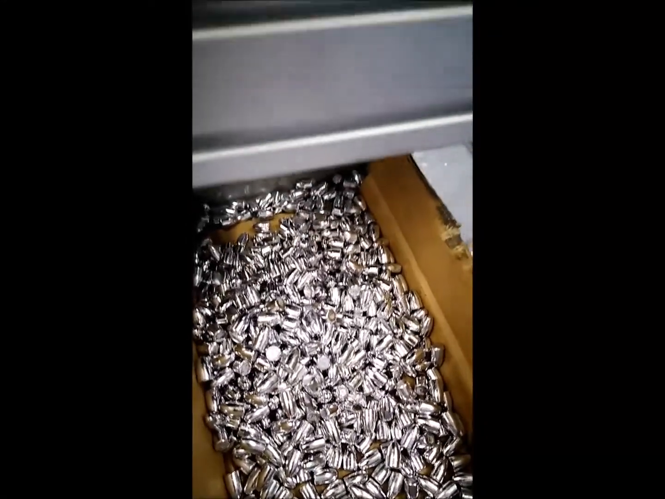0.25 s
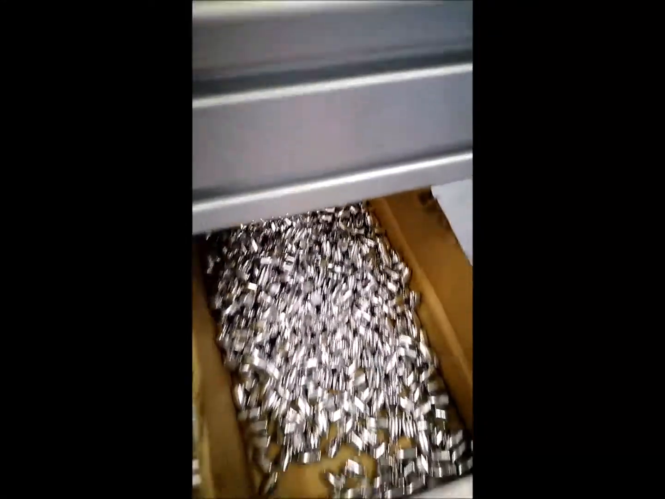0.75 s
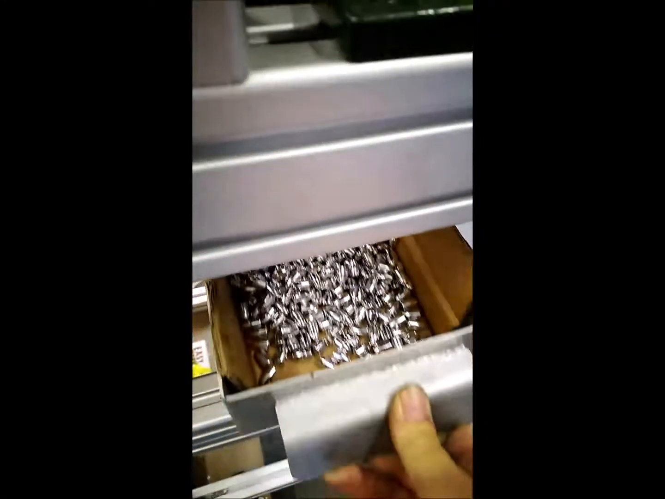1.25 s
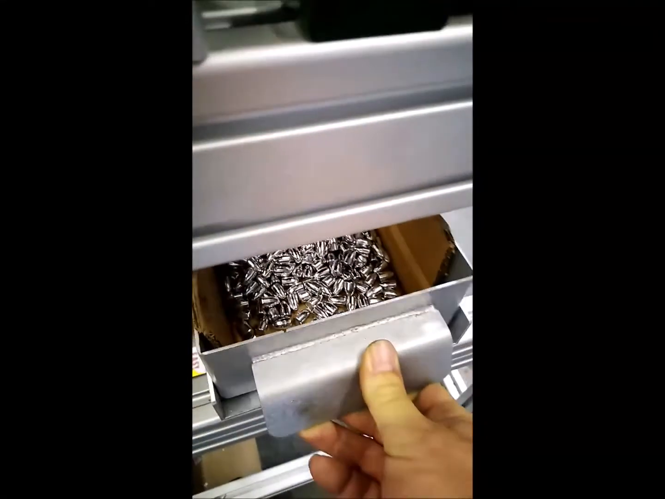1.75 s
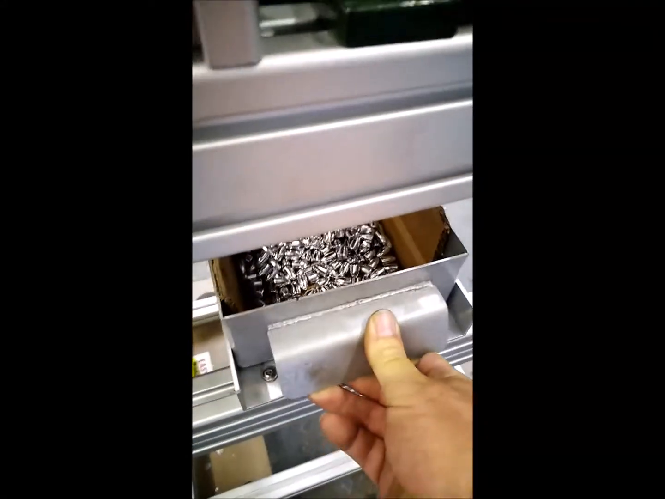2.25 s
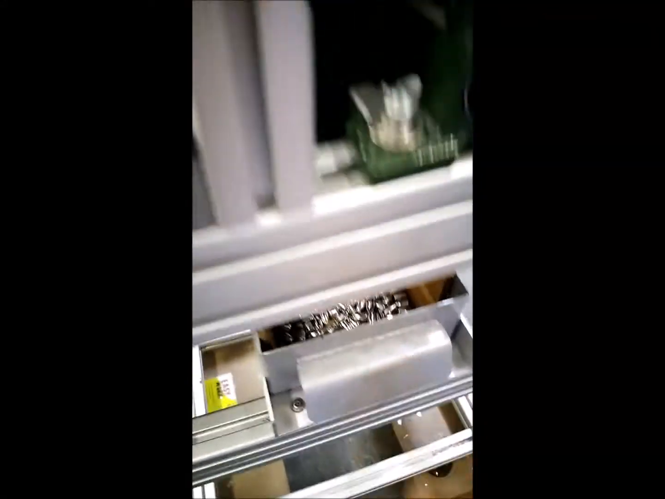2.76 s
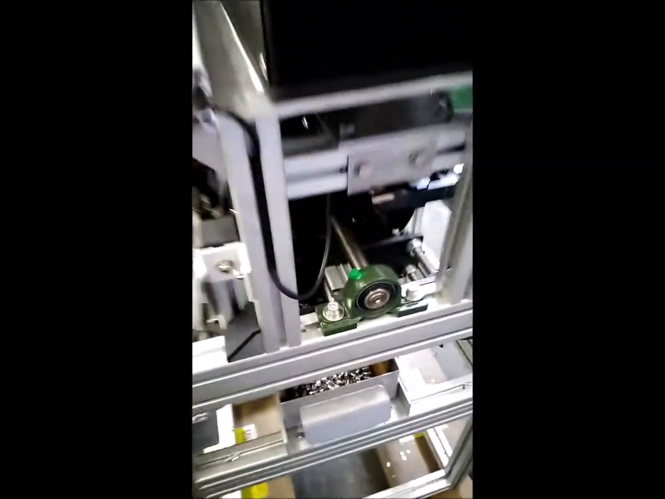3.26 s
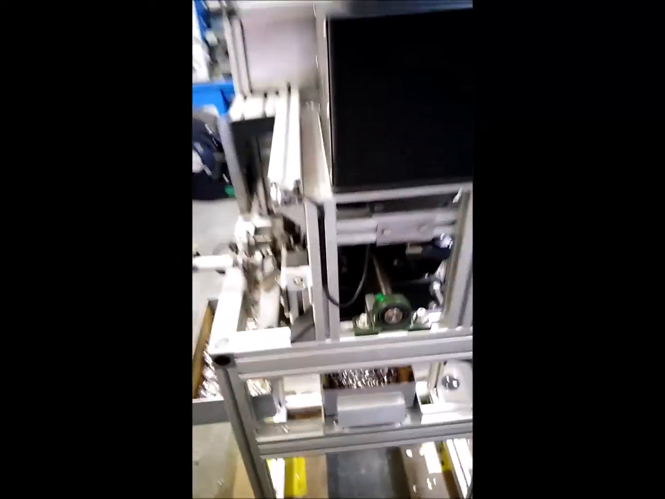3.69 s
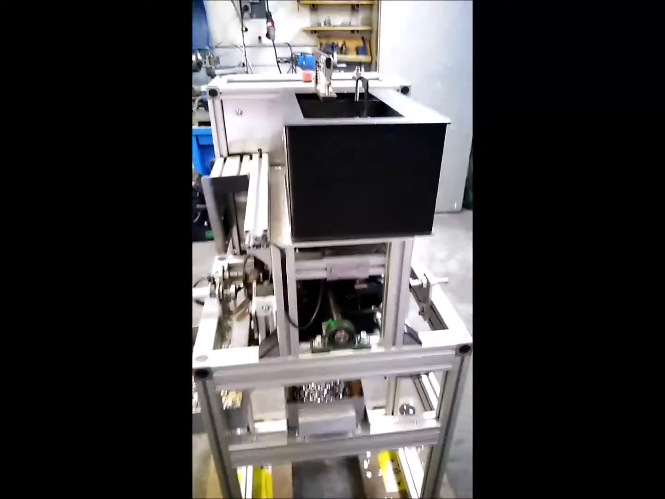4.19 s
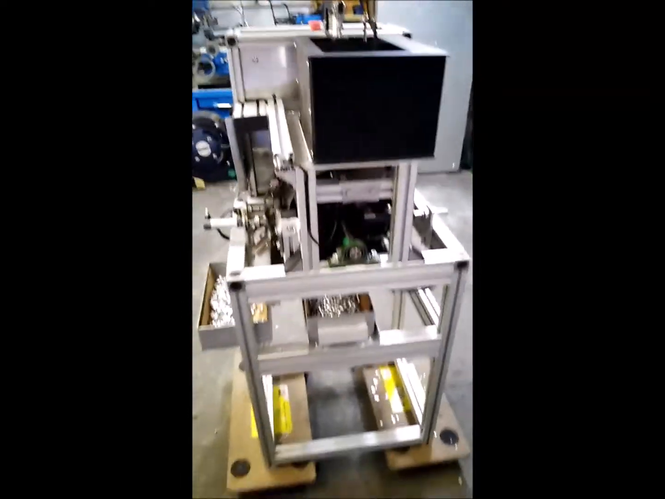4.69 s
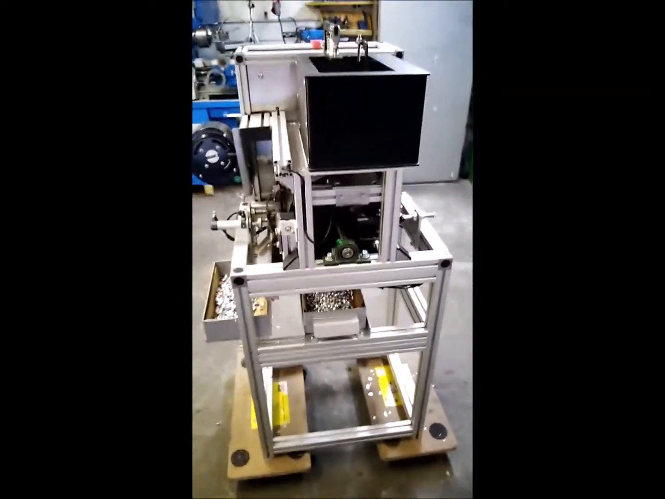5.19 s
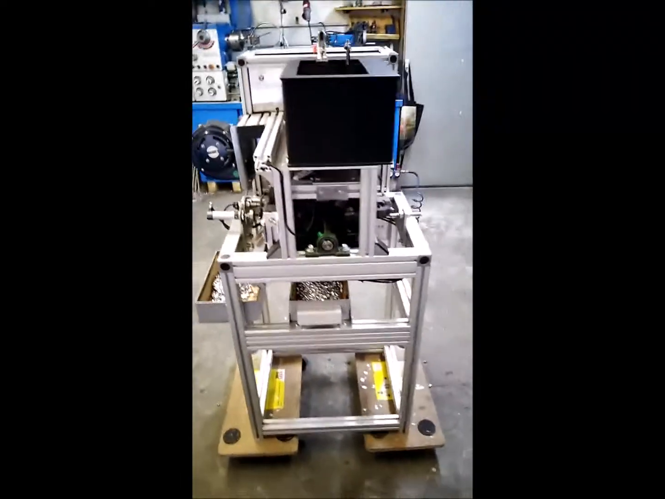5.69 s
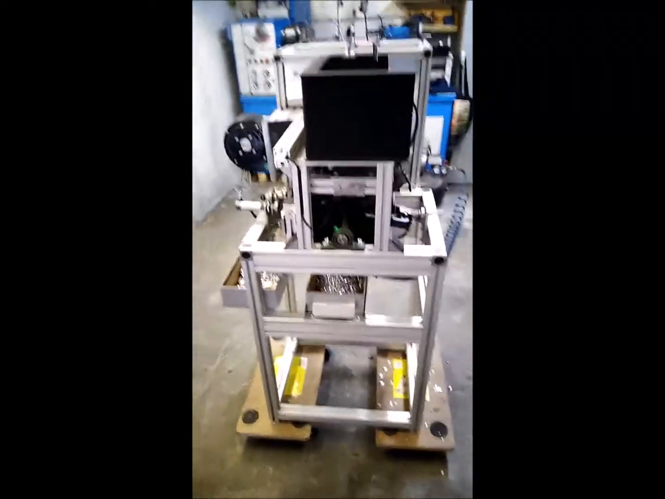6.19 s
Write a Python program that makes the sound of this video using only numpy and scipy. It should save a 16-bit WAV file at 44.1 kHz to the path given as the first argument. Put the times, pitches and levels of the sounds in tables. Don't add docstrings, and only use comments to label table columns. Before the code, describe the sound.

A stereo phone microphone in a hard-walled workshop. Over a thin, flickering mid-pitched motor whine, a drawer jolts at 0.13 s and its small metal parts tick. From 0.5 s it slides, droning and scraping with shaking parts, knocks at 0.75, slows and snags near 1.26. From 1.35 to 2.0 s a pneumatic machine erupts: sharp air jets, rattling cylinder clanks and parts tinkling on a steel chute, loudest and clipping around 1.85. More blasts come at 2.6 and 2.84, then hollow metal knocks and a heavy thud at 3.08, and a last hiss-clank at 3.23. Echoes and whine sink away by 4.0. In near-silence a faint latch clicks at 4.44 with a sagging spring creak; watery hum scraps flicker, and low air thumps hit the right side at 5.2-5.5. From 5.7 to the end, the machine cycles again, more distant and echoing, tails cut short.

```python
import sys
import numpy as np
from scipy import signal
from scipy.fft import rfft, irfft, next_fast_len
from scipy.io import wavfile
from scipy.ndimage import uniform_filter1d, map_coordinates

SR = 44100
rng = np.random.default_rng(int(sys.argv[2]) if len(sys.argv) > 2 else 0)


def to_wav(sig):
    pcm = np.clip(np.atleast_2d(sig), -1, 1) * 32767
    pcm = np.round(pcm).astype(np.int16)
    wavfile.write(sys.argv[1], SR, pcm.T)


def invert_db(level):
    return 10 ** (np.asarray(level, dtype=float) / 20)


N = 284004


def unit(x):
    return x / np.sqrt(np.mean(x ** 2) + 1e-20)


def along(points, hz):
    f, v = np.transpose(points)
    return np.interp(np.log(hz + 1), np.log(f + 1), v)


def curves(rows, outside=None):
    s, *columns = np.transpose(rows)
    t = np.arange(N) / SR
    return [np.interp(t, s, column, outside, outside) for column in columns]


def wobble(rate):
    knots = rng.standard_normal(int(N * rate / SR) + 4)
    return map_coordinates(knots, [np.arange(N) * rate / SR])


def filtered(x, response):
    n = x.shape[-1]
    m = next_fast_len(n + 8192)
    return irfft(rfft(x, m) * response(np.fft.rfftfreq(m, 1 / SR)), m)[..., :n]


def peak(f, hz, width_hz):
    return np.abs(f * width_hz / (hz * hz - f * f + 1j * f * width_hz))


def resonances(f, rows, extra_db=0):
    return sum(invert_db(db + extra_db) * peak(f, hz, width_hz) for hz, width_hz, db in rows)


def dying(t60, rise):
    t = np.arange(SR // 2) / SR
    return invert_db(-60 * t / max(t60, .01)) * (1 - np.exp(-t / max(rise, .0003)))


def held(s, length, rise, fall):
    shape, i = np.zeros(N), max(round(s * SR), 0)
    t = np.arange(min(N - i, SR // 2)) / SR
    shape[i:][:len(t)] = np.clip(t / rise, 0, 1) * invert_db(-60 * np.clip(t - length, 0, 1) / fall)
    return shape


# frequency in Hz, likeness from 0 to 1.
PORT_LIKENESS = [(100, 0.96), (250, 0.94), (600, 0.56), (1200, 0.021)]


def pair(n):
    turn = lambda hz: np.arccos(np.clip(along(PORT_LIKENESS, hz), 0, 1)) / 2
    split = lambda hz: np.array([np.cos(turn(hz)), np.sin(turn(hz))])
    mid, side = filtered(rng.standard_normal((2, n)), split)
    return np.array([mid + side, mid - side])


def rush(spectrum, lumpy_db):
    z = signal.stft(pair(N), nperseg=512)[2]
    field = uniform_filter1d(rng.standard_normal(z.shape), size=5, axis=1)
    field = uniform_filter1d(field, size=5, axis=2)
    patchy = signal.istft(z * invert_db(lumpy_db * unit(field)), nperseg=512)[1][:, :N]
    return unit(filtered(patchy, lambda hz: invert_db(along(spectrum, hz))))


def new_bus():
    return np.zeros((3, N + SR))


LEFT_LAG = 20


def add(bus, s, burst, db, pan_db, echo_db):
    i = round(s * SR)
    bus[0, i + LEFT_LAG:][:len(burst)] += invert_db(db + pan_db / 2) * burst
    bus[1, i:][:len(burst)] += invert_db(db - pan_db / 2) * burst
    bus[2, i:][:len(burst)] += invert_db(db + echo_db) * burst


# frequency in Hz, level in dB per Hz.
AIR_SPECTRUM = [(880, -39), (1500, -24.5), (2630, -12.5), (2940, -16), (3450, -11), (3860, -14.5),
                (5500, -9.5), (7350, -4), (9110, -5.5), (11800, -16.5), (14000, -25.5)]
# frequency in Hz, width in Hz, level in dB.
VALVE_BLOCK_MODES = [(4940, 16, -8), (6120, 7.7, -11), (6650, 4.6, -7.5), (7140, 4.5, -4), (7460, 32, 6),
                     (7845, 110, 7), (8400, 3.5, -3.5), (9350, 2.3, -0.5)]
JET_GRAIN_DB = 2


def air_jet():
    colour = lambda hz: invert_db(along(AIR_SPECTRUM, hz)) * (1 + resonances(hz, VALVE_BLOCK_MODES))
    jet = unit(filtered(rng.standard_normal(N + SR), colour))
    grain = np.tile(invert_db(JET_GRAIN_DB * wobble(220)), 2)[:N + SR]
    return unit(jet * grain)


VENT_T60_S, VENT_RISE_S = 0.11, 0.00072
VENT_HALVES_DB = 30.5
VENT_FAR_DOUBLES_DB = 30.5


def bursts(jet, rows, shorter):
    bus = new_bus()
    for s, db, pan_db, echo_db in rows:
        t60 = shorter * VENT_T60_S * .5 ** (db / VENT_HALVES_DB - echo_db / VENT_FAR_DOUBLES_DB)
        burst = jet[round(s * SR):][:SR // 2] * dying(t60, VENT_RISE_S)
        add(bus, s, burst, db - 10, pan_db, echo_db)
    return bus


# start in seconds, peak level in dB, left-right difference in dB, echo in dB.
EXHAUSTS = [(1.2631, -33, -11, -11), (1.342, -13.5, 1, -2), (1.3774, -20, -12, -1), (1.3966, -3.5, 8, -26),
            (1.4515, -6.5, 9, -30), (1.47, -6.5, -9, -15), (1.5219, -11, -5, 0), (1.5327, 9.5, 10.5, -2),
            (1.5868, 7.5, -1, -4.5), (1.605, -0.5, 3, -19), (1.8437, 20, 3, -5), (1.866, 10, 16.5, -14),
            (1.93, 12, -5, -7), (1.953, -0.5, 0, -9.5), (2.5614, -3.5, 10.5, -4), (2.5817, 1, -9, 4),
            (2.6092, 13.5, 1, -9.5), (2.8354, 14, 6.5, -3.5), (3.0771, 3, -3, -3),
            (3.1776, -6.5, -0.5, 10.5), (3.226, -6, -2, -9), (3.2328, 0.5, 15, -9.5),
            (4.429, -36.5, -11, 3.5), (4.438, -32, -9, 0.5), (4.4526, -31.5, -18.5, -19.5),
            (5.6626, -35.5, 2, -12), (5.668, -19.5, 1, 6.5), (5.7171, -21, -11.5, -5),
            (5.778, -9, -2, -0.5), (5.846, 1.5, -10.5, 2.5), (5.918, -1, -12, 3.5), (6.163, 2, -6, 8.5),
            (6.1944, -8, 10, 7), (6.289, -1, 7, 3.5)]


def valves(jet):
    return bursts(jet, EXHAUSTS, shorter=0.96)


# start in seconds, peak level in dB, ringing in Hz, echo in dB.
CYLINDER_STOPS = [(0.142, -30.5, 430, -0.5), (0.75, -11.5, 498, -4), (1.347, -21, 809, 8),
                  (1.376, -19, 809, 9), (1.396, -10.5, 591, -11), (1.399, -9.5, 2200, -8.5),
                  (1.45, 2, 540, -9), (1.461, -5.5, 2180, -11), (1.471, -7.5, 2150, -4.5),
                  (1.524, 2, 1730, 2), (1.585, -3.5, 1416, -2.5), (1.604, 7.5, 1793, -4),
                  (1.865, 5, 2435, -1), (1.961, -9.5, 630, 7), (1.979, -13, 2090, 0.5),
                  (2.572, -5.5, 630, -2.5), (2.586, -5.5, 1879, -17), (2.608, -1, 2700, -1.5),
                  (2.844, -19, 2270, 2.5), (2.974, -15.5, 777, 4), (3.027, -18, 730, 9.5),
                  (3.045, -22.5, 740, 13.5), (3.176, -20.5, 666, 5), (3.23, -3, 2403, -7.5),
                  (3.228, -11, 1248, 0), (5.671, -29, 2358, 2), (5.7, -18.5, 687, 7.5),
                  (5.779, -3.5, 2250, 0), (5.845, -4, 2442, 1), (5.85, -4, 600, 0.5), (5.866, -11, 1450, 2),
                  (5.94, -5, 1500, 0), (5.913, -2, 2120, 4), (5.989, -24, 2366, 1), (6.193, -5, 1940, 2),
                  (6.205, -4.5, 2500, 0.5), (6.235, -12, 887, 4), (6.31, -10, 2640, 5.5)]
# start in seconds, peak level in dB, ringing in Hz, echo in dB.
LATCHES = [
    (0.176, -32.5, 3514, -2.5),
    (4.44, -28.5, 1010, 0.5),
]
# frequency in Hz, width in Hz, level in dB.
FRAME_MODES = [(792.4, 200, -20.5), (1260, 190, 12), (1640, 16, -12.5), (2200, 30, 11.5), (3262, 48, -22.5)]
# frequency in Hz, level in dB per Hz.
CLANK_SPECTRUM = [(88, -30.5), (150, -1.5), (238, -1), (516, -6), (700, -1.5), (1020, -6.5), (1400, -6),
                  (2170, -6), (3090, -8), (6000, -11), (7800, -57.5), (13200, -120)]
STOP_T60_S, STOP_HALVES_DB = 0.074, 27.5
TILT_DB, TILT_BY_PITCH_DB = -0.5, -0.53
FRAME_SHIFT, FRAME_SCATTER_DB = .08, 4
SMALL_SHARE = 0.13
CHATTER_DB = 3


def stops():
    bus = new_bus()
    chatter = np.tile(invert_db(CHATTER_DB * wobble(250)), 2)
    for rows, on_frame in (CYLINDER_STOPS, True), (LATCHES, False):
        for s, db, ring_hz, echo_db in rows:
            t60 = STOP_T60_S * .5 ** (db / STOP_HALVES_DB)
            tilt_db = TILT_DB + TILT_BY_PITCH_DB * np.log2(ring_hz / 1200)
            spot = rng.standard_normal((len(FRAME_MODES), 2)) * [FRAME_SHIFT, FRAME_SCATTER_DB]
            modes = [(hz * (1 + shift), width, level + more)
                     for (hz, width, level), (shift, more) in zip(FRAME_MODES, spot)]
            rings = lambda f: 2.0 + 2.8 * peak(f, ring_hz, 170) + on_frame * resonances(f, modes, -8)
            body = lambda f: f ** 2 / (f ** 2 + (SMALL_SHARE * ring_hz) ** 2)
            tilted = lambda f: invert_db(along(CLANK_SPECTRUM, f) + tilt_db * np.log2((f + 50) / 1200))
            noise = chatter[round(s * SR) % N:][:SR // 5] * rng.standard_normal(SR // 5)
            rattle = unit(filtered(noise, lambda f: tilted(f) * rings(f) * body(f)))
            blow = rattle * dying(t60, .003)[:SR // 5]
            add(bus, s, blow, db - 3.5, 1.5, echo_db)
    return bus


# start in seconds, peak level in dB, ringing in Hz,
# decay time t60 in seconds, echo in dB.
DULL_KNOCKS = [(0.132, -27, 169.5, 0.18, -3.5), (0.746, -23, 419, 0.21, 3.5), (1.393, -24, 282, 0.14, 7),
               (1.445, -23, 360.3, 0.22, -7), (1.53, -19, 301, 0.041, 1.5), (1.872, -20, 337.4, 0.27, -4.5),
               (2.049, -25.5, 450.5, 0.63, -3), (2.571, -31, 281, 0.11, -7), (2.641, -25, 286, 0.26, 12),
               (2.967, -25, 441, 0.15, -5), (3.08, 3, 188.2, 0.062, -7), (3.121, -5, 171, 0.14, -14),
               (3.18, -14, 153, 0.094, 14.5), (3.228, -16, 270.4, 0.075, 6), (5.714, -35, 326, 0.52, 10),
               (5.85, -24, 300, 0.04, -4), (6.201, -25, 260.4, 0.46, -6),
               (6.326, -34.5, 263.7, 0.96, -25.5)]
# frequency in Hz, level in dB per Hz.
THUD_SPECTRUM = [(18, -47.5), (30, -35), (149, -8), (199, -5.5), (301, -8.5), (422, -10), (600, -13.5),
                 (780, -28.5), (1320, -120)]


def knocks():
    bus = new_bus()
    for s, db, ring_hz, t60, echo_db in DULL_KNOCKS:
        colour = lambda hz: invert_db(along(THUD_SPECTRUM, hz)) * (0.86 + peak(hz, ring_hz, width_hz=21))
        thud = unit(filtered(rng.standard_normal(SR // 2), colour)) * dying(t60, 0.034)
        add(bus, s, thud, db, 0, echo_db)
    return bus


# start in seconds, peak level in dB, frequency in
# Hz, width in Hz, decay time t60 in seconds.
RINGING_PARTS = [(0.132, -25, 426, 16, 0.075), (0.639, -34, 1870, 34, 2.3), (1.959, -30, 152.1, 4.5, 0.98),
                 (2.597, -27, 152.8, 4.1, 0.92), (2.975, -3, 717, 43, 0.036), (3.025, -6.5, 760, 67, 0.075),
                 (3.03, -12.5, 1454, 54, 0.079), (3.045, -7, 758, 100, 0.093), (3.068, -14, 748, 85, 0.06),
                 (3.08, -11, 155.2, 4, 0.6), (3.081, -13, 178.1, 8, 0.25), (3.082, -7, 289.6, 35, 0.17),
                 (4.444, -25, 577, 66, 0.33), (4.44, -25, 972, 170, 0.18), (4.441, -28.5, 357, 53, 0.14),
                 (4.444, -31, 1338, 46, 0.41), (4.468, -29, 1590, 125, 0.11), (5.85, -7, 1320, 117, 0.5),
                 (6.198, -21, 258.2, 14, 1.17),
                 (0.478, -40, 420, 30, .3), (0.75, -31, 1900, 25, .4), (1.6, -12, 1748, 12, .2),
                 (1.846, -15, 8230, 40, .1), (1.535, -17, 7671, 12, .3), (1.535, -18, 8226, 15, .3),
                 (5.848, -20, 7564, 16, .4), (2.16, -30, 1942, 8, .6), (1.975, -15, 2094, 10, .25),
                 (1.98, -25, 1942, 10, .4), (4.5, -43, 520, 140, .5), (1.262, -30, 1680, 40, .1)]


def ringing():
    bus, t = new_bus(), np.arange(SR // 2) / SR
    for s, db, hz, width_hz, t60 in RINGING_PARTS:
        step = np.sqrt(2 * np.pi * abs(width_hz) / SR)
        wander = np.cumsum(rng.standard_normal(len(t))) * step
        tone = filtered(np.sin(2 * np.pi * hz * t + wander), lambda f: peak(f, hz, hz))
        add(bus, s, tone * dying(t60, 0.00027), db, 0, echo_db=-7)
    return bus


# frequency in Hz, level in dB.
CHUTE_MODES = [(4140, -9), (4860, -9), (5772, -9), (6212, -6), (6670, -9), (6885, -1), (7254, 0),
               (7550, -6), (7752, -3), (7827, -2), (8870, -8), (9180, -4), (9652, -11)]
# start in seconds, peak level in dB, decay time t60 in seconds.
CHUTE_STRIKES = [(1.4, -24, .2), (1.535, -24, .2), (1.846, -20, .25), (1.931, -15, .35), (1.953, -18, .35),
                 (2.61, -26, .2), (2.837, -24, .2), (3.232, -26, .25), (5.847, -27, .25), (5.918, -26, .25),
                 (6.166, -18, .35), (6.235, -19, .4), (6.29, -19, .4)]
STRIKE_SCATTER_DB, CHUTE_WIDTH_HZ, CHUTE_ECHO_DB = 2, 16, -5


def chute():
    bus, t = new_bus(), np.arange(SR // 2) / SR
    hz, level_db = np.transpose(CHUTE_MODES)[:, :, None]
    step = np.sqrt(100 * np.pi * CHUTE_WIDTH_HZ / SR)
    for s, db, t60 in CHUTE_STRIKES:
        wander = np.cumsum(rng.standard_normal((len(hz), len(t) // 50 + 1)), axis=1) * step
        phase = 2 * np.pi * hz * t + np.repeat(wander, 50, axis=1)[:, :len(t)]
        mix = invert_db(level_db + STRIKE_SCATTER_DB * rng.standard_normal(hz.shape))
        plate = (mix * np.sin(phase)).sum(axis=0)
        add(bus, s, plate * dying(t60, .002), db, 0, CHUTE_ECHO_DB)
    return bus


CLINKS, CLINK_LOW_HZ, CLINK_HIGH_HZ = 16, 1500, 7000
CLINK_SPREAD_S, CLINK_T60_S = .09, .025
CLINK_DB, CLINK_FADE_DB_PER_S, CLINK_SCATTER_DB = 4, 55, 4


def clinks():
    bus, t = new_bus(), np.arange(SR // 30) / SR
    for s, db, _ in CHUTE_STRIKES:
        for wait, pitch, size, side in rng.random((CLINKS, 4)):
            late = -CLINK_SPREAD_S * np.log(1 - wait)
            hz = CLINK_LOW_HZ * (CLINK_HIGH_HZ / CLINK_LOW_HZ) ** pitch
            tones = np.sin(2 * np.pi * hz * t) + .6 * np.sin(2 * np.pi * 1.47 * hz * t)
            ping = tones * invert_db(-60 * t / CLINK_T60_S)
            level_db = db + CLINK_DB - CLINK_FADE_DB_PER_S * late + CLINK_SCATTER_DB * (2 * size - 1)
            add(bus, s + late, ping, level_db, 12 * side - 6, -6)
    return bus


# start in seconds, peak level in dB,
# left-right difference in dB, echo in dB.
DRAWER_TICKS = [
    (0.134, -20.5, 12, -7),
    (0.1465, -11, -15.5, -3.5),
    (0.176, -24, -2, -7),
    (0.632, -16, 1, -5),
    (0.749, -16.5, 2, -3.5),
    (1.2177, -29.5, 0, -5.5),
]
TICK_DULL_HZ = 9100


def ticks(jet):
    dull = filtered(jet, lambda hz: 1 / (1 + (hz / TICK_DULL_HZ) ** 8))
    return bursts(dull, DRAWER_TICKS, shorter=0.61)


# time in seconds, level in dB under full speed.
DRAWER_SPEED = [
    (0.476, -21.5),
    (0.5, -14.5),
    (0.56, -7),
    (0.63, -1),
    (0.8, 0),
    (1.08, -3.5),
    (1.248, -6.5),
    (1.268, -2.5),
    (1.298, -7),
    (2.4, -22.5),
]
# time in seconds, drone pitch over its mean.
DRONE_PITCH = [(0.476, 0.88), (0.53, 0.81), (0.6, 0.99), (0.68, 1), (0.76, 0.94), (0.94, 0.99), (1.05, 1.0),
               (1.2, 1.024), (1.33, 1.05)]
# frequency in Hz, level in dB per Hz.
RUNNER_SPECTRUM = [(35, -59.5), (60, -52), (172, -22.5), (317, -19), (430, -9), (499, 5), (585, -10.5),
                   (633, 3), (822, -8.5), (900, -20.5), (1170, -45.5), (1980, -120)]
# frequency in Hz, level in dB per Hz.
SCRAPE_SPECTRUM = [(470, -30), (800, -12.5), (960, -8), (1750, -10), (1910, -7.5), (3360, -13),
                   (4000, -24.5), (5200, -52.5), (8800, -120)]
# frequency in Hz, level in dB per Hz.
PARTS_SPECTRUM = [(2060, -43), (3500, -10.5), (4760, -5), (5440, -7.5), (8450, -2.5), (10700, -16.5),
                  (13300, -25), (14000, -33)]
RUNNER_DB, SCRAPE_DB, PARTS_DB = -30, -32.5, -33.5
RUNNER_GROWS, SCRAPE_GROWS, PARTS_GROWS = 0.93, 1.7, 1.3


def drawer():
    speed_db, = curves(DRAWER_SPEED, -120)
    read = np.cumsum(curves(DRONE_PITCH)[0]) % (N - 1)
    drone = np.array([np.interp(read, np.arange(N), side) for side in rush(RUNNER_SPECTRUM, lumpy_db=3.5)])
    drone = invert_db(RUNNER_DB + RUNNER_GROWS * speed_db) * drone
    scrape = invert_db(SCRAPE_DB + SCRAPE_GROWS * speed_db) * rush(SCRAPE_SPECTRUM, lumpy_db=2)
    parts = invert_db(PARTS_DB + PARTS_GROWS * speed_db) * rush(PARTS_SPECTRUM, lumpy_db=2.5)
    return drone + scrape + parts


# time in seconds, frequency in Hz, level in dB.
SPRING_CREAK = [
    (4.44, 1628, -35),
    (4.5, 1632, -43),
    (4.559, 1483, -46),
    (4.61, 1392, -46.5),
    (4.66, 1497, -52.5),
    (4.72, 1585, -55.5),
    (4.77, 1545, -67),
]
CREAK_ROUGH_DB, CREAK_WAVER = 3, 2.4


def creak():
    tone_hz, = curves([row[:2] for row in SPRING_CREAK])
    level_db, = curves([row[::2] for row in SPRING_CREAK], -120)
    waver = CREAK_WAVER * np.array([wobble(120), wobble(120)])
    turn = 2 * np.pi * np.cumsum(tone_hz) / SR + waver
    return invert_db(level_db + CREAK_ROUGH_DB * wobble(60)) * np.sin(turn)


# frequency in Hz, decay time t60 in seconds.
HALL_DECAY = [(100, 1.1), (500, 1.16), (2000, 1.503), (7000, 1.004), (13000, 0.62)]


def hall(x):
    hz, t, z = signal.stft(pair(3 * SR // 2), SR, nperseg=256)
    tail = signal.istft(z * invert_db(-60 * t / along(HALL_DECAY, hz)[:, None]), SR, nperseg=256)[1]
    delayed = np.pad(x, (400, 0))[None]
    return signal.fftconvolve(delayed, tail / np.linalg.norm(tail[0]), axes=1)[:, :N]


# frequency in Hz, level in dB.
SUPPRESSOR_THRESHOLD = [(100, -71), (165, -50), (300, -60), (800, -52), (1500, -63.5), (2400, -67),
                        (4000, -93), (8000, -72), (11000, -88), (14000, -91)]


def suppressed(x):
    hz, _, z = signal.stft(x, SR, nperseg=1024)
    power = uniform_filter1d(np.abs(z) ** 2, size=3, axis=1)
    power = np.abs(uniform_filter1d(power, size=3, axis=2))
    keep = power / (power + invert_db(along(SUPPRESSOR_THRESHOLD, hz))[:, None] ** 2)
    total = power.sum(axis=(0, 1))
    gate = total ** 1.5 / (total ** 1.5 + invert_db(-43.0) ** 3)
    return signal.istft(z * keep * gate, SR, nperseg=1024)[1][:, :N]


# time in seconds, level in dB.
WHINE_LEVEL = [(0.0, -47), (0.27, -47), (0.36, -42), (0.45, -42), (0.6, -40.5), (1.05, -38.5), (1.33, -35),
               (2.15, -44), (2.3, -35.5), (2.55, -35), (3.5, -48), (3.8, -54), (3.89, -63), (3.99, -87),
               (4.75, -74), (5.65, -78)]
WHINE_HZ, WHINE_WIDTH_HZ, WHINE_STEADY = 816, 70, 2.6


def whine():
    turn = 2 * np.pi * np.cumsum(WHINE_HZ + 3 * wobble(30)) / SR
    flicker_db = 2.2 * wobble(70) + .3 * wobble(9)
    drift = .35 * wobble(30)
    fuzz = unit(filtered(rng.standard_normal(N), lambda f: peak(f, WHINE_HZ, WHINE_WIDTH_HZ) ** 2))
    tone = np.sin([turn + drift, turn - drift])
    return invert_db(curves(WHINE_LEVEL)[0] + flicker_db - 9) * (WHINE_STEADY * tone + fuzz)


# time in seconds, level in dB.
HUM_LEAK = [(0.0, -55.5), (0.2, -53.5), (0.31, -56.5), (0.45, -55), (3.88, -70), (3.96, -77), (5.65, -90)]
# start in seconds, length in seconds, hum level in dB.
SUPPRESSOR_LAPSES = [
    (3.956, 0.02, -85),
    (4.076, 0.12, -77),
    (4.915, 0.13, -84),
    (5.161, 0.16, -74),
    (5.368, 0.13, -72.5),
]
# frequency in Hz, level in dB per Hz.
HUM_SPECTRUM = [(40, -22.5), (120, -13), (260, -13.5), (500, -13), (900, -13.5), (1700, -18.5), (2100, -19),
                (3000, -25), (6000, -30)]
# frequency in Hz, width in Hz, level in dB.
DUCT_MODES = [(244, 28, 4.5), (1850, 14, 10), (2150, 39, 4), (2950, 56, 8), (3200, 83, 6), (4200, 99, 6.5)]
# frequency in Hz, level in dB per Hz.
HISS_SPECTRUM = [(2500, -41.5), (5200, -20), (6000, -12.5), (7000, -12), (7600, -8), (8500, -11.5),
                 (9500, -31.5), (11000, -74.5)]
# frequency in Hz, width in Hz, level in dB.
AIR_LINE_MODES = [(5780, 43, -10), (6630, 73, -11.5), (7540, 71, -1), (8280, 99, -14.5), (8890, 41, -8.5),
                  (9400, 46, -18.5)]
LAPSE_RISE_S, LAPSE_FALL_S, HISS_DB, SELF_NOISE_DB = 0.0083, 0.07, -3.5, -87


def hum_bed():
    hum = rush(HUM_SPECTRUM, lumpy_db=4)
    hum = unit(filtered(hum, lambda hz: 1 + resonances(hz, DUCT_MODES)))
    hiss = rush(HISS_SPECTRUM, lumpy_db=2.5)
    hiss = unit(filtered(hiss, lambda hz: 1 + resonances(hz, AIR_LINE_MODES, 11.5)))
    leak = invert_db(curves(HUM_LEAK)[0])
    for s, length, db in SUPPRESSOR_LAPSES:
        leak = leak + invert_db(db) * held(s, length, LAPSE_RISE_S, LAPSE_FALL_S)
    own_colour = lambda hz: invert_db(along([(5000, 1.0), (9000, -5.5), (13000, -20.5)], hz))
    own = invert_db(SELF_NOISE_DB) * unit(filtered(pair(N), own_colour))
    return (invert_db(-6.0) * leak + invert_db(-71.5)) * hum + invert_db(HISS_DB + 6.0) * leak * hiss + own


# start in seconds, peak level in dB, frequency in Hz,
# left-right difference in dB, length in seconds.
HUM_SCRAPS = [(0.0, -59.5, 2150, 8, 0.05), (0.245, -62, 1170, 3, 0.02), (0.405, -52.5, 2260, 5, 0.024),
              (0.413, -56.5, 1215, 13, 0.044), (3.848, -76.5, 8640, 2.5, 0.13),
              (3.968, -70.5, 1850, 9.5, 0.039), (4.06, -62.5, 1850, 22, 0.12), (4.07, -68, 376, 2, 0.11),
              (4.104, -68, 1304, 22.5, 0.039), (4.119, -70.5, 2950, 7.5, 0.1),
              (4.302, -69.5, 2950, 14.5, 0.04), (4.898, -59.5, 824, -7, 0.12),
              (4.962, -61, 1214, 13, 0.053), (5, -72, 2816, 5.5, 0.028), (5.156, -65, 1293, 20.5, 0.075),
              (5.16, -67.5, 810, 0.0, 0.15), (5.22, -72.5, 3500, 3.5, 0.04), (5.225, -72.5, 4200, 5, 0.027),
              (5.44, -70, 1255, -18, 0.033)]


def scraps():
    t = np.arange(N) / SR
    waver, rough = 1.1 * wobble(90), invert_db(5 * wobble(45) - 4)
    out = np.zeros((2, N))
    for s, peak_db, tone_hz, pan_db, length in HUM_SCRAPS:
        swell = rough * held(s, length, 0.0047, 0.23)
        sides = invert_db(peak_db + np.array([[.5], [-.5]]) * pan_db)
        out += sides * swell * np.sin(2 * np.pi * tone_hz * t + waver)
    return out


# start in seconds, length in seconds, level in dB.
GUSTS = [
    (5.216, 0.089, -38),
    (5.368, 0.11, -37.5),
    (5.374, 0.018, -28),
    (5.502, 0.11, -60),
]
# frequency in Hz, level in dB per Hz.
GUST_SPECTRUM = [(15, -39.5), (25, -31.5), (70, 4), (130, 0), (299, -37.5), (400, -44.5), (520, -70.5),
                 (880, -120)]
GUST_RISE_S, GUST_FALL_S = 0.0101, 0.08


def buffet():
    level = sum(invert_db(db) * held(s, length, GUST_RISE_S, GUST_FALL_S) for s, length, db in GUSTS)
    thump = unit(filtered(rng.standard_normal(N), lambda hz: invert_db(along(GUST_SPECTRUM, hz))))
    return level * thump * invert_db([[-28], [0]])


def scene():
    jet = air_jet()
    bus = valves(jet) + ticks(jet) + stops() + knocks() + ringing() + chute() + clinks()
    left, right, walls = bus[:, :N]
    machine = suppressed(np.array([left, right]) + hall(walls))
    return machine + drawer() + creak() + whine() + hum_bed() + scraps() + buffet()


# frequency in Hz, share of the time.
BAND_DROPOUT = [(2800, 0), (3100, .3), (3900, .25), (5300, .2), (6200, .06), (9000, .03), (10000, .3),
                (13000, .5)]


def starved(x):
    hz, t, z = signal.stft(x, SR, nperseg=2048, noverlap=1536)
    luck = uniform_filter1d(rng.standard_normal((len(hz), len(t))), size=7, axis=1)
    rank = luck.argsort(axis=1).argsort(axis=1) / len(t)
    band = (25 * np.log(hz + 1000)).astype(int) - 150
    keep = rank[band] >= along(BAND_DROPOUT, hz)[:, None]
    return signal.istft(z * keep, SR, nperseg=2048, noverlap=1536)[1][:, :N]


# frequency in Hz, left-right difference in dB.
PORT_COLOUR = [(60, -2), (150, -0.5), (370, -2), (900, 0.5), (2230, 5.5), (5490, -2.5), (13600, 6)]


def top_cut(x):
    return signal.sosfilt(signal.butter(12, 14160, fs=SR, output="sos"), x)


def record(dry):
    colour = lambda hz: invert_db(np.outer([.5, -.5], along(PORT_COLOUR, hz)))
    ports = filtered(dry, lambda hz: colour(hz) * hz ** 2 / (hz ** 2 + 60 ** 2))
    thinned = starved(np.clip(1.042 * ports, -1.02, 1.02))
    return top_cut(np.clip(thinned, -1, 1))


dry = scene()
out = record(dry)
to_wav(out)
```